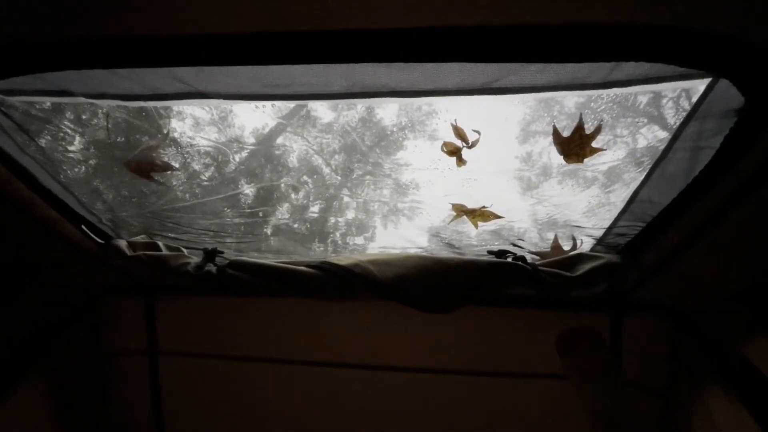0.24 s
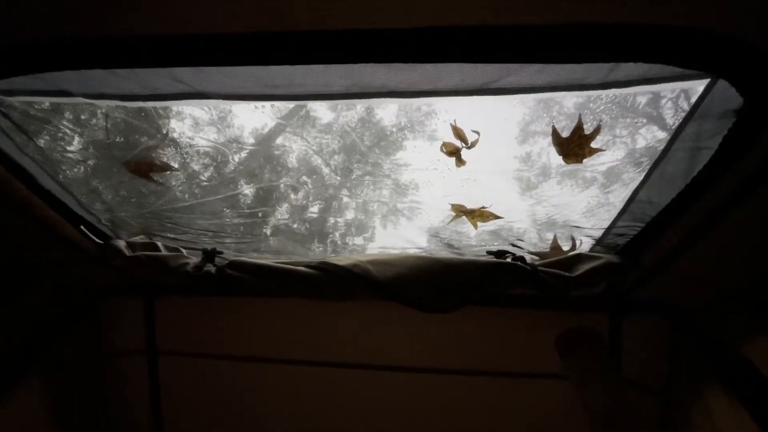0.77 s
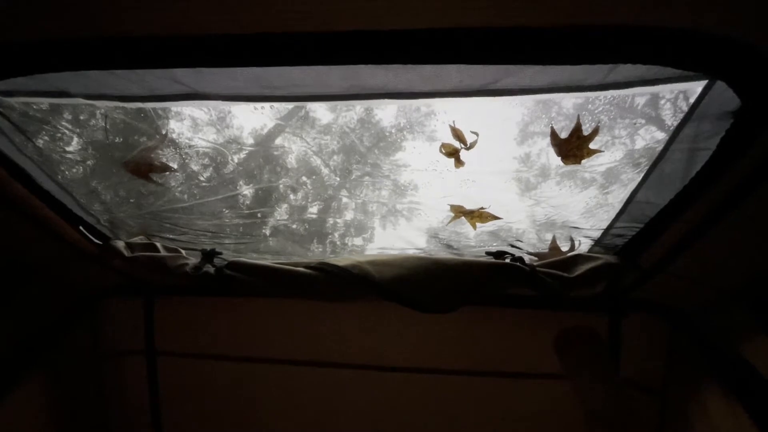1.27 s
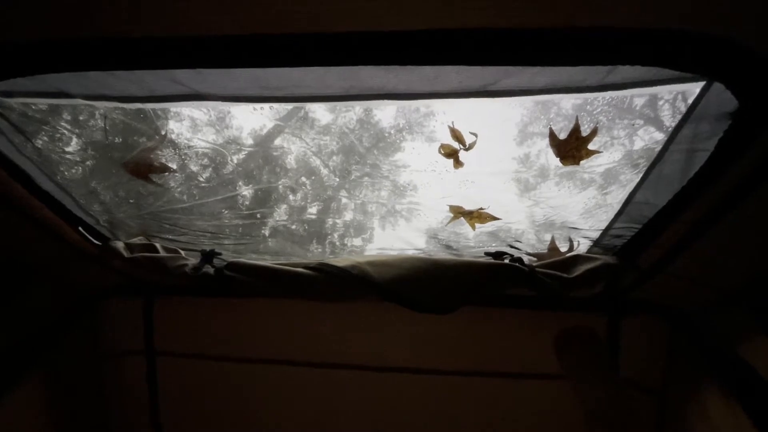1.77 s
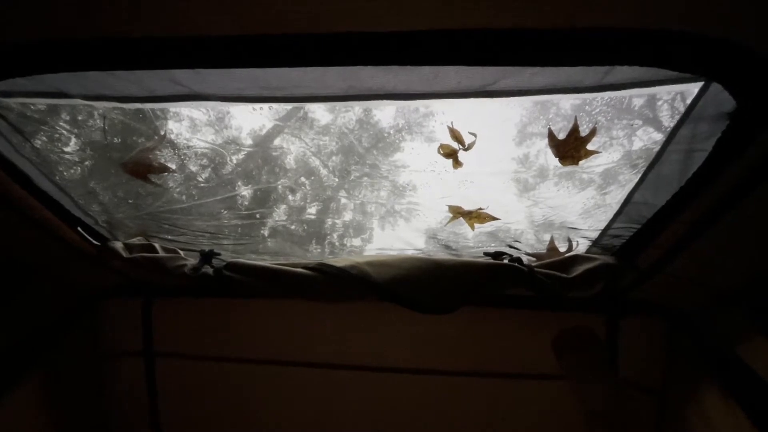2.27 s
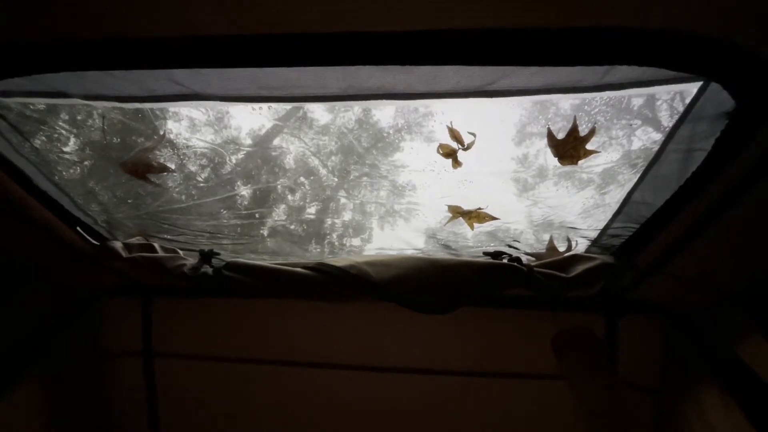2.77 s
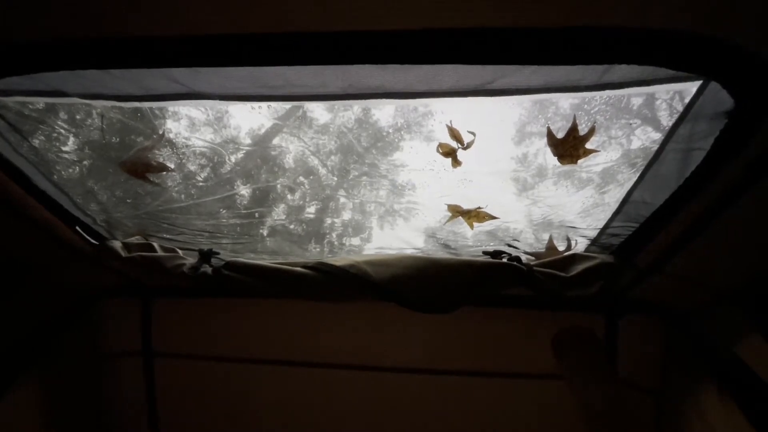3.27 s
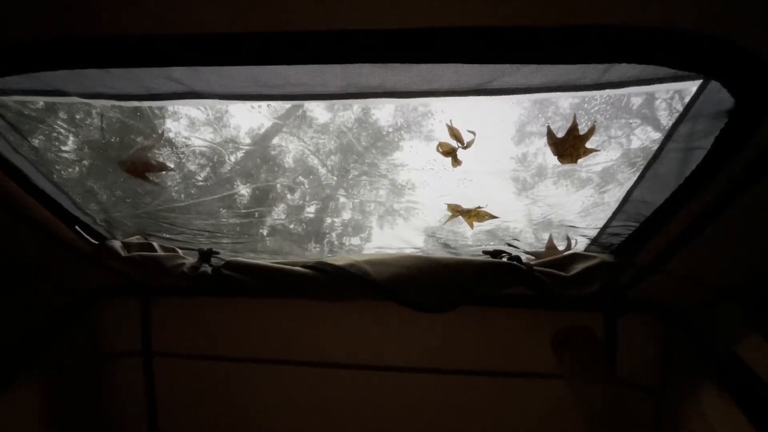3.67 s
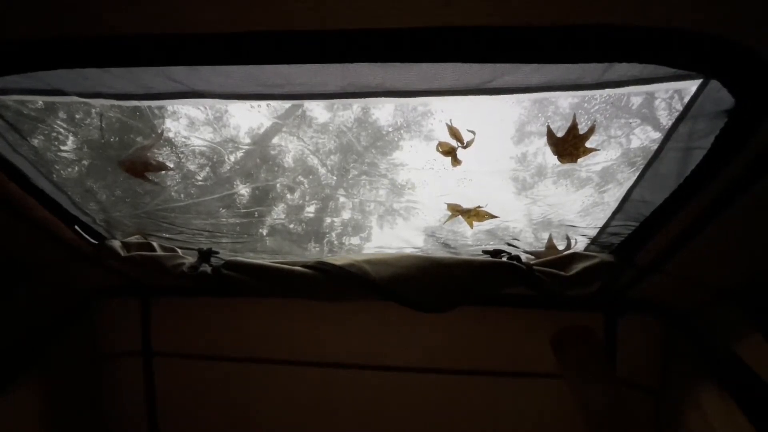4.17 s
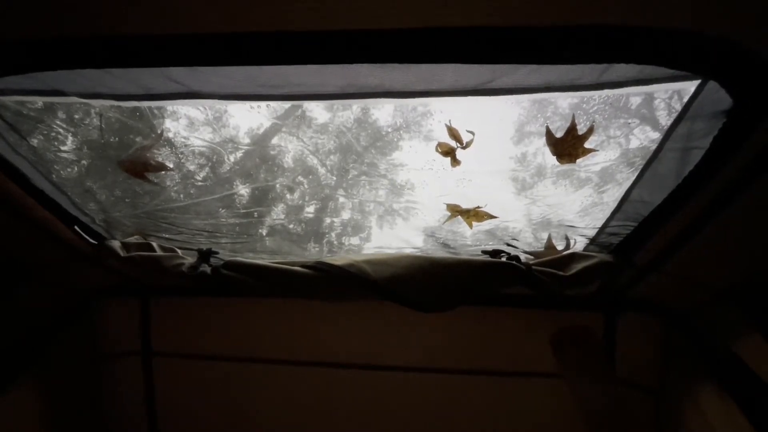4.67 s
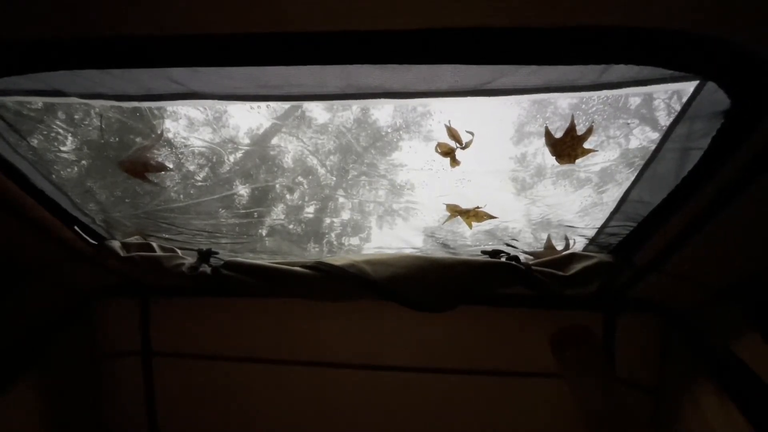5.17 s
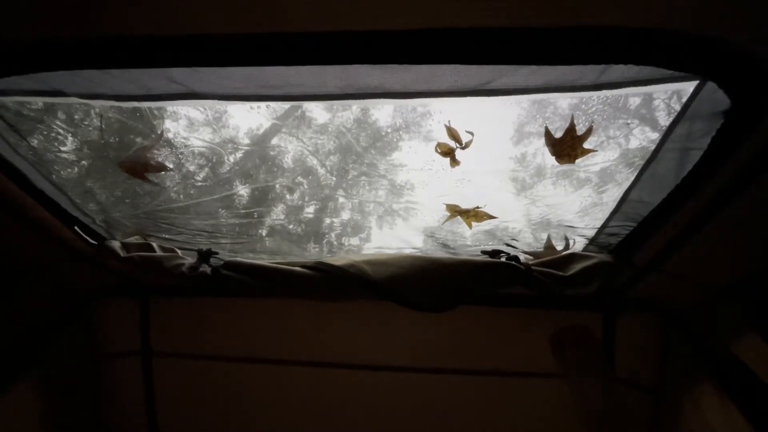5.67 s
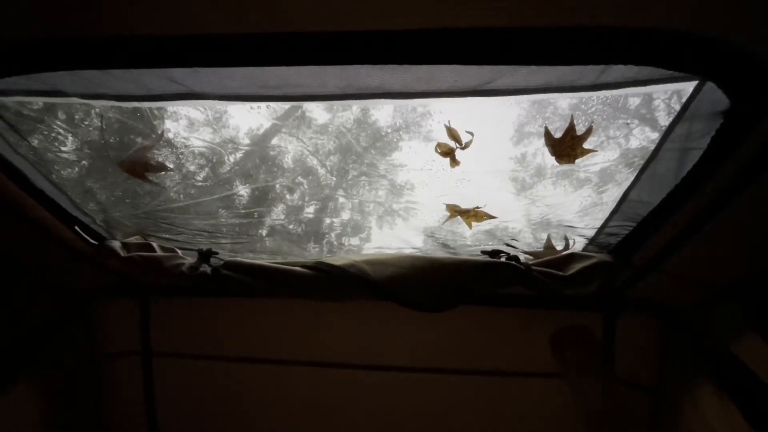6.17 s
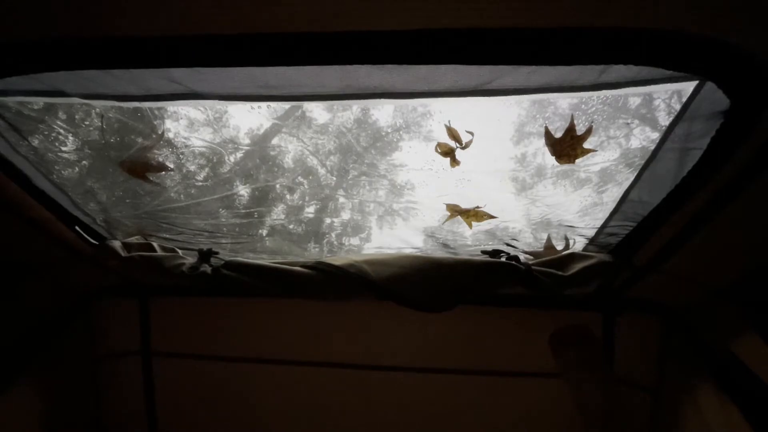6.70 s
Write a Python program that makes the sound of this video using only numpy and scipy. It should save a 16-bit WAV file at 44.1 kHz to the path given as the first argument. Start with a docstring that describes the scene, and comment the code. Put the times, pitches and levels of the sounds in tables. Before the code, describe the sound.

A diesel heater drones low with fan whir and a regular pump tick, while drops tap tent fabric and a bird whistles outside.

```python
"""Diesel heater beside a tent, with birds

A diesel air heater runs steadily: flame drone and fan air are shaped noise, duct modes are narrow-band noise,
the motor whines as a sine and the fuel pump ticks through the modes of its body. Drops and twigs tap the fabric
as noise bursts. A wren repeats a three-note phrase of gliding sines in the woods, another bird whistles thinly,
leaves begin to rush and a far bird chatters. Two spaced microphone ports listen inside, over a steady hiss."""
import sys
import numpy as np
from scipy import signal
from scipy.fft import rfft, irfft, next_fast_len
from scipy.io import wavfile
from scipy.ndimage import map_coordinates

SR = 44100
rng = np.random.default_rng(int(sys.argv[2]) if len(sys.argv) > 2 else 0)


def transcribe(u):
    """Save the signal u as a 16-bit wav file named by the first command-line argument.

    u: samples, shape (n,) or (channels, n), limited to [-1, 1]; the rate is SR.
    q: integer samples, one column per channel.
    """
    v = np.clip(np.atleast_2d(u).T, -1, 1)
    q = np.round(v * 32767).astype(np.int16)
    wavfile.write(sys.argv[1], SR, q)


N = 306054


def amp(db):
    """dB to gain."""
    return 10 ** (np.asarray(db) / 20)


def unit(x):
    """Scale to rms 1."""
    return x / np.sqrt(np.mean(x ** 2) + 1e-20)


def along(points, hz):
    """Columns of (Hz, value, ..) rows, interpolated on a log frequency axis."""
    f, *cols = np.transpose(points)
    return np.squeeze([np.interp(np.log(hz + 1), np.log(f + 1), c) for c in cols])


def curves(rows, t):
    """Columns of (s, value, ..) rows at times t."""
    s, *cols = np.transpose(rows)
    return [np.interp(t, s, c) for c in cols]


def wobble(knots_per_s):
    """Smooth random curve through normally distributed knots."""
    knots = rng.standard_normal(int(N * knots_per_s / SR) + 4)
    return map_coordinates(knots, [np.arange(N) * knots_per_s / SR])


def filtered(x, response):
    """x times a complex response of frequency."""
    m = next_fast_len(x.shape[-1] + 8192)
    return irfft(rfft(x, m) * response(np.fft.rfftfreq(m, 1 / SR)), m)[..., :x.shape[-1]]


def resonance(f, hz, width_hz):
    """Complex response of one mode."""
    return 1j * f * width_hz / (hz * hz - f * f + 1j * f * width_hz)


def dulled(f, hz, order):
    """Gain of a low-pass."""
    return 1 / np.sqrt(1 + (f / hz) ** (2 * order))


def drifting(x, share):
    """x with its pitch wandering by a share, through five knots a second."""
    at = np.cumsum(1 + share * wobble(5))
    return np.array([np.interp(at * (N - 1) / at[-1], np.arange(N), c) for c in x])


def ports(pan_db, lead_rad):
    """Gain and phase of a wave at the left and right port; the right leads."""
    half = amp(pan_db / 2) * np.exp(-.5j * lead_rad)
    return np.array([half, 1 / half])


def add(track, s, sound):
    """Mix a sound into a track at s seconds."""
    part = track[..., round(s * SR):][..., :sound.shape[-1]]
    part += sound[..., :part.shape[-1]]


# Sound field at the ports. Each row: frequency in Hz, left-right likeness 0-1, left over right in dB.
PORT_FIELD = [(25, 0.83, 2.5), (55, 1, -1), (85.3, 1, -2), (117, 0.88, 10.5), (148, 0.7, -0.5),
              (180, 1, -10), (246, 0.72, 2.5), (368, 0.63, 4), (544, 0.9, 1.5), (970, 0.17, 7.5),
              (1540, 0.34, 7), (1970, 0.51, 0.5), (2880, 0.05, 5), (8250, 0.01, 8), (9500, 0, 2),
              (9400, 1, -3), (12000, 1, 1)]
# Phase of diffuse noise. Each row: frequency in Hz, radians by which the right port leads.
PORT_LEAD = [(100, 0), (145, 1.3), (190, 0), (260, .3), (320, 1.5), (450, 1.3), (560, 2.8), (2000, 2.7),
             (3000, 1.5), (8000, 3.1), (9000, 6.3), (10200, 9.4), (12000, 12.6)]


def stereo_noise(spectrum):
    """Noise of rms 1: a shared and an opposed part set how alike the ports are at each frequency."""
    def field(hz):
        alike, pan_db = along(PORT_FIELD, hz)
        turn = np.arccos(np.clip(alike, 0, 1)) / 2
        mix = np.array([np.cos(turn), np.sin(turn)])[:, None]
        return mix * amp(along(spectrum, hz)) * ports(pan_db, along(PORT_LEAD, hz))
    shared, opposed = filtered(rng.standard_normal((2, 1, N)), field)
    return unit(shared + [[1], [-1]] * opposed)


# Burner course before wobble. Each row: time in seconds, drone level in dB, airflow level in dB.
BURN_COURSE = [(0, -35, -39.5), (.4, -38.5, -39.5), (3, -36, -40), (5.2, -36, -40.5), (6.4, -33, -40),
               (6.94, -39, -38.5)]
# Flame in the exhaust. Each row: frequency in Hz, relative density in dB per Hz.
DRONE_SPECTRUM = [(25, -50.5), (40, -17), (58, -9), (74, -6), (91, 4.5), (106, -1), (130, -19), (200, -14),
                  (260, -39.5), (1000, -110)]
# Fan airflow. Each row: frequency in Hz, relative density in dB per Hz.
AIR_SPECTRUM = [(60, -18), (140, 0), (210, -4.5), (290, -5), (390, -15.5), (580, -15), (760, -14),
                (1000, -18.5), (1400, -24), (1900, -25.5), (2600, -35), (3700, -49), (6000, -80.5),
                (12000, -110)]
# Resonances of duct and casing. Each row: frequency in Hz, width in Hz of one filter pass (two are made),
# level in dB before flutter, left over right in dB, radians by which the right port leads.
DUCT_MODES = [(206, 28.6, -50.5, 2, 0), (305.8, 4.64, -54.5, -10, 0.46), (339.9, 29.25, -56, 1.5, 1.5),
              (425.1, 18.6, -60.5, 0, 1), (513, 40, -65.5, 9, 3.5), (790, 35.6, -46.5, -4.5, 3),
              (824.7, 27.7, -53, -2, 1.2), (898, 42, -52, -0.5, 2.5), (983, 22, -63.5, -4, 4.5),
              (1064, 103, -58, 2.5, 1.44), (1144.7, 91.4, -52.5, -21.5, 2.5), (1233, 45, -69, 1, 4),
              (1524, 110, -56.5, 0.5, 2.5), (1666, 54.4, -56.5, 8.5, 2), (1857, 30, -68, -4.5, -8.5)]
# Fan motor's tone: centre frequency in Hz, peak level in dB before wobble, left over right in dB,
# radians by which the right port leads.
MOTOR_WHINE = (711, -56.5, 0.5, 2)
MOTOR_WAVER_HZ = 3
DRONE_DRIFT_SHARE = .03  # of the drone's pitch
MODE_DRIFT_SHARE = .15  # of a mode's width


def burner_and_fan():
    """Turbulent flame and fan air: two shaped noises whose levels wander, the drone's pitch too."""
    drone_db, air_db = curves(BURN_COURSE, np.arange(N) / SR)
    drone = drifting(stereo_noise(DRONE_SPECTRUM), DRONE_DRIFT_SHARE)
    air = stereo_noise(AIR_SPECTRUM)
    return amp(drone_db + 0.26 * wobble(7.6)) * drone + amp(air_db + 1.05 * wobble(6)) * air


def duct():
    """Air drives narrow resonances, each a noise band that is one coherent wave at the ports."""
    out = np.zeros((2, N))
    for hz, width_hz, db, pan_db, lead_rad in DUCT_MODES:
        mode = lambda f: ports(pan_db, lead_rad)[:, None] * resonance(f, hz, width_hz) ** 2
        flutter_db = .9 * wobble(2) + 1.6 * wobble(8)
        band = unit(filtered(rng.standard_normal(N), mode))
        out += amp(db + flutter_db) * drifting(band, MODE_DRIFT_SHARE * width_hz / hz)
    return out


def motor():
    """The fan motor whines: a sine of slightly wandering pitch and level."""
    hz, db, pan_db, lead_rad = MOTOR_WHINE
    turns = np.cumsum(hz + MOTOR_WAVER_HZ * wobble(6)) / SR
    wave = np.real(ports(pan_db, lead_rad)[:, None] * np.exp(2j * np.pi * turns))
    return amp(db + 3.3 * wobble(7.9)) * wave


# Background hiss. Each row: frequency in Hz, relative density in dB per Hz.
HISS_SPECTRUM = [(1500, -37), (3000, -1.5), (5000, -4.5), (7500, -3), (9000, -4.5), (10200, -12.5),
                 (11500, -14.5), (12600, -24), (15500, -29.5)]


def hiss():
    """Steady treble noise."""
    return amp(-72.0) * stereo_noise(HISS_SPECTRUM)


def sung(rows):
    """Whistled note along (s, Hz, rms dB) rows: a gliding sine with soft ends."""
    t = np.arange(rows[0][0], rows[-1][0], 1 / SR)
    hz, db = curves(rows, t)
    sine = np.sin(2 * np.pi * np.cumsum(hz) / SR)
    return np.sqrt(2) * amp(db) * signal.windows.tukey(len(t), .15) * sine


# Arched whistles, one list a note. Each row: time in seconds, frequency in Hz,
# rms level in dB before flicker and panning.
WHISTLE_NOTES = [
    [(.09, 5600, -87), (.12, 6100, -79), (.14, 6450, -92), (.17, 6850, -84), (.21, 7050, -82),
     (.25, 6970, -87), (.3, 6780, -79), (.34, 6630, -92), (.385, 6200, -73), (.44, 6100, -76),
     (.48, 6280, -92), (.52, 6280, -90), (.555, 6150, -79), (.59, 5800, -84), (.625, 5600, -86)],
    [(3.61, 5650, -87), (3.66, 5950, -84), (3.7, 6300, -82), (3.72, 6620, -94), (3.74, 6880, -83),
     (3.765, 7100, -83), (3.8, 7500, -79), (3.885, 7890, -69), (3.915, 7620, -70), (3.94, 7760, -69),
     (3.962, 7570, -74), (4.0, 7720, -66), (4.025, 7680, -69), (4.07, 7820, -73), (4.11, 7640, -69),
     (4.14, 7350, -85), (4.17, 6900, -96), (4.21, 6300, -85), (4.235, 6050, -80), (4.27, 5750, -90)],
]


def whistles():
    """Thin high gliding sines whose level flickers."""
    out = np.zeros(N)
    for note in WHISTLE_NOTES:
        add(out, note[0][0], sung(note))
    return out * amp(2.7 * wobble(49))


# Snap of a tap. Each row: frequency in Hz, relative density in dB per Hz.
SNAP_SPECTRUM = [(1500, -67), (2500, -31.5), (4500, 2), (8500, 1), (10500, -10), (12300, -18), (13500, -60)]
# Taps on the fabric. Each row: start in seconds, level in dB, centre of the thud in Hz,
# snap in dB above the thud, t60 of the thud in seconds.
FABRIC_TAPS = [(0.363, -61, 5160, -14, 0.18), (.373, -54.5, 3240, -10, 0.042), (.564, -68, 3440, -4, 0.051),
               (.664, -65, 3220, -14, .12), (1.094, -64, 2500, -12.5, .054),
               (1.373, -57.5, 3460, 1.5, 0.077), (1.741, -59.5, 2820, -27, 0.12),
               (1.785, -64, 2500, -20, 0.099), (1.85, -58, 3400, -18, 0.037),
               (1.854, -50, 3340, -6.5, 0.081), (1.877, -54.5, 3020, -9, 0.13),
               (2.572, -51, 1150, -40, 0.077), (2.574, -57.5, 2770, -26, 0.12),
               (2.608, -56.5, 4600, -3.5, 0.11), (3.196, -74, 4660, 8, 0.072),
               (3.358, -56.5, 4500, -17, 0.14), (3.6, -66, 3200, -26, .2), (3.809, -58, 2780, -33, 0.12),
               (3.826, -55.5, 2230, -33, 0.086), (3.989, -62.5, 3200, -22, 0.23),
               (4.618, -57, 2700, -22, 0.085), (4.656, -57, 3980, -4, 0.094),
               (4.675, -59.5, 2940, -34, 0.19), (5.885, -62, 2500, -22, 0.2), (6.439, -59, 2600, -21, 0.11),
               (6.487, -68, 2550, -25, .1), (6.595, -70, 4500, -22, .2), (6.62, -61, 2400, -23, 0.07),
               (6.675, -60, 4800, -6, 0.07), (6.847, -58, 3300, -5, .06), (6.862, -62, 3020, -26, 0.15)]
CRACK_DB, CRACK_T60_S = 6, .018  # first instant, over the body before softening
SOFTENS_DB_PER_S = 68.5  # crack loses this per second of the tap's t60
RISE_SHARE = 0.038  # rise time constant over t60
SPATTER_STEP = 147  # samples: 300 steps a second


def taps():
    """Taut fabric: spattering thud, dull knock and shorter, brighter snap, led by a crack with a ring."""
    out, t = np.zeros((2, N)), np.arange(SR // 4) / SR
    for s, db, hz, snap_db, t60 in FABRIC_TAPS:
        # droplets and rebounds
        spatter = amp(3.5 * np.repeat(rng.standard_normal(len(t) // SPATTER_STEP), SPATTER_STEP))
        noise = rng.standard_normal((3, 1, len(t))) + 0.56 * rng.standard_normal((3, 2, len(t)))
        thud = unit(filtered(spatter * noise[0], lambda f: resonance(f, hz, 0.38 * hz) ** 2))
        knock = unit(filtered(spatter * noise[1], lambda f: resonance(f, 1900, 1400) ** 2))
        snap = unit(filtered(noise[2], lambda f: amp(along(SNAP_SPECTRUM, f))))
        body = (thud + amp(9.5) * knock) * amp(-60 * t / t60) + snap * amp(snap_db - 110 * t / t60)
        ring = 2 * np.sin(2 * np.pi * hz * t)  # taut cloth at contact
        crack_db = CRACK_DB - SOFTENS_DB_PER_S * t60 - 60 * t / CRACK_T60_S
        crack = (thud + ring + snap * amp(snap_db)) * amp(crack_db)
        rise = 1 - np.exp(-t / (RISE_SHARE * t60))
        add(out, s, amp(db) * (crack + body * rise))
    return out


# Scattering in the woods. Each row: frequency in Hz, t60 in seconds, relative strength in dB.
WOODS_DECAY = [(1000, 0.49, -14), (2350, 0.9, -7), (3130, 0.92, -3.5), (3600, 0.78, -3), (4430, 0.6, 1.5),
               (5500, 0.19, 4), (8950, 0.055, 13)]
STIR_S = .07  # foliage moves: the next echo pattern leads after this


def echoes(x, rise_s, wet_db):
    """Trunks scatter: tails build up, each frequency dies at its own speed, three patterns take turns."""
    out, turn = 0, np.arange(N) / SR / STIR_S % 3
    for k in range(3):
        hz, t, z = signal.stft(rng.standard_normal((2, SR)), SR, nperseg=256)
        t60, db = along(WOODS_DECAY, hz)[:, :, None]
        envelope = amp(db - 60 * t / t60) * (1 - np.exp(-t / rise_s))
        tail = signal.istft(z * envelope, SR, nperseg=256)[1]
        tail = tail / np.linalg.norm(tail[0])
        share = np.cos(np.pi * (turn - k) / 3) ** 2
        out = out + signal.fftconvolve(x * share, tail, axes=1)[:, :N]
    return amp(wet_db) * out


# Pump timing: first stroke in seconds, period in seconds.
PUMP_TIMING = (.456, .8311)
# Contacts in a stroke. Each row: seconds late, level in dB ahead of the body modes, t60 in seconds.
STROKE_CONTACTS = [(-.004, -48, 0.022), (0, -44.5, 0.039), (.009, -49, .06)]
# Pump body. Each row: mode frequency in Hz, width in Hz, gain in dB.
PUMP_MODES = [(2150, 320, 7.5), (3840, 740, -2), (5400, 500, -3), (6360, 330, 2), (7340, 500, -2.5),
              (9500, 1100, -25)]


def pump():
    """At a fixed period the piston lifts, strikes and rebounds: dry rattles through broad body modes."""
    blows, t = np.zeros((2, N)), np.arange(SR // 10) / SR
    first_s, period_s = PUMP_TIMING
    for s in np.arange(first_s, N / SR, period_s):
        for late_s, db, t60 in STROKE_CONTACTS:
            rattle = rng.standard_normal(len(t)) + .5 * rng.standard_normal((2, len(t)))
            envelope = amp(db - 60 * t / t60) * (1 - np.exp(-t / 0.00017))
            add(blows, s + late_s, envelope * rattle)

    def body(f):
        # neighbouring modes have opposite sign
        return sum((-1) ** k * amp(db) * resonance(f, hz, width_hz)
                   for k, (hz, width_hz, db) in enumerate(PUMP_MODES))
    return filtered(blows, body)


# Glides of the phrase, one list a note. Each row: seconds after the phrase starts, frequency in Hz
# before variation, level in dB relative to the phrase.
WREN_NOTES = [
    [(-.004, 2530, -12), (.016, 2515, -1), (.038, 2460, -4), (.048, 2430, -11), (.056, 2385, -4),
     (.07, 2335, -1), (.088, 2250, -7)],
    [(.108, 2800, -17), (.115, 3140, -15), (.126, 3170, -7), (.139, 3200, -7), (.145, 3370, -1),
     (.15, 3520, -5), (.156, 3570, -12)],
    [(.2, 4800, -20), (.205, 4450, -14), (.21, 4000, -14), (.214, 3480, -7), (.219, 2950, -10),
     (.23, 2570, -9)],
]
# Each row: start of a phrase in seconds, level in dB before variation and the ports.
WREN_PHRASES = [(1.928, -50.5), (2.321, -49), (2.715, -48.5), (3.136, -50), (6.79, -55.5)]
# Each row: frequency in Hz, radians by which the right port leads.
WREN_PORT_LEAD = [(2300, 1.5), (2420, 0.56), (2510, 4), (3150, 3.1), (3500, 1.3), (4600, 6.2)]
WAVER_HZ, WAVER_STEP_S = 14, .004  # pitch unsteadiness


def wren():
    """One phrase of three gliding sines, slightly varied and wavering; higher notes favour the left port."""
    out = np.zeros(N)
    for s, db in WREN_PHRASES:
        for note in WREN_NOTES:
            t = np.arange(note[0][0], note[-1][0], WAVER_STEP_S)
            hz, note_db = curves(note, t)
            hz = hz * rng.normal(1, 0.005) + WAVER_HZ * rng.standard_normal(len(t))
            add(out, s + t[0], amp(db + rng.normal(0, 1)) * sung(np.transpose([t, hz, note_db])))
    at_ports = lambda f: ports(along(PORT_FIELD, f)[1], along(WREN_PORT_LEAD, f))
    return filtered(out * amp(2.4 * wobble(90)), at_ports)


def tree_line(song):
    """One dull echo off the tree line, 0.1 s late."""
    dull = filtered(song, lambda hz: dulled(hz, 2800, order=8))
    return amp(-11) * np.pad(dull, ((0, 0), (round(.1 * SR), 0)))[:, :N]


# Leaf noise. Each row: frequency in Hz, relative density in dB per Hz.
LEAF_SPECTRUM = [(900, -11), (1800, 3.5), (2600, 1), (3600, -9.5), (5500, -19.5), (8000, -20.5),
                 (11000, -77.5)]
RUSH_START_S, RUSH_RISE_S = 4.12, 0.52
RUSH_START_DB, RUSH_GROWTH_DB_PER_S = -71.5, 5


def leaves():
    """A breeze sets in and keeps growing: fluttering shaped noise, faded in, then rising in level."""
    since_s = np.maximum(np.arange(N) / SR - RUSH_START_S, 0)
    level_db = RUSH_START_DB + RUSH_GROWTH_DB_PER_S * since_s + 1.3 * wobble(11)
    return amp(level_db) * np.minimum(since_s / RUSH_RISE_S, 1) * stereo_noise(LEAF_SPECTRUM)


# Far bird's chips. Each row: time of the peak in seconds, peak level in dB before panning.
FAR_CHIPS = [(6.44, -78), (6.53, -76), (6.6, -82), (6.777, -72), (6.8, -79), (6.817, -71), (6.85, -75),
             (6.865, -70), (6.88, -72), (6.91, -75), (6.924, -77)]
CHIP_HALF_S = 0.011  # from the peak to 1/e


def chatter():
    """A far bird blurred to chips: narrow-band noise under bell-shaped envelopes."""
    t = np.arange(N) / SR
    band = unit(filtered(rng.standard_normal(N), lambda f: resonance(f, 5200, 700) ** 2))
    return band * sum(amp(db) * np.exp(-((t - s) / CHIP_HALF_S) ** 2) for s, db in FAR_CHIPS)


FOLIAGE_HZ, FABRIC_HZ = 3800, 11800  # low-pass on the direct song; on ticks and taps


def scene():
    """Ticks and taps reach the left port more strongly in most of the treble; the woods echo them and the song."""
    reach = lambda hz: ports(along(PORT_FIELD, hz)[1], 1.59) * dulled(hz, FABRIC_HZ, order=8)
    heater = burner_and_fan() + duct() + motor()
    near = filtered(taps() + pump(), reach)
    near = near + echoes(near, 0.0056, -10.5)
    song = wren()
    direct = filtered(song, lambda hz: dulled(hz, FOLIAGE_HZ, order=8))
    woods_song = direct + tree_line(song) + echoes(song, 0.012, -4)
    thin_birds = (whistles() + chatter()) * amp([[3.5], [-5]])  # left, right dB
    return heater + hiss() + near + woods_song + leaves() + thin_birds


TOP_HZ = 15720


def record(dry):
    """Band limit: nothing passes above TOP_HZ."""
    padded = np.pad(dry, ((0, 0), (512, 512)), "reflect")
    return filtered(padded, lambda hz: hz < TOP_HZ)[:, 512:-512]


dry = scene()
out = record(dry)
transcribe(out)
```